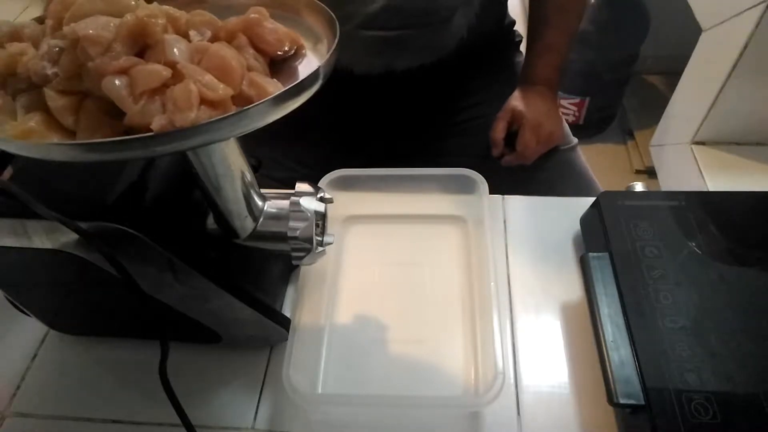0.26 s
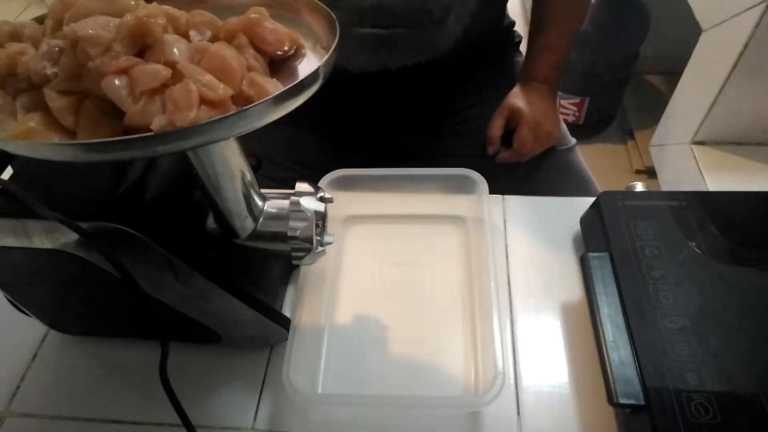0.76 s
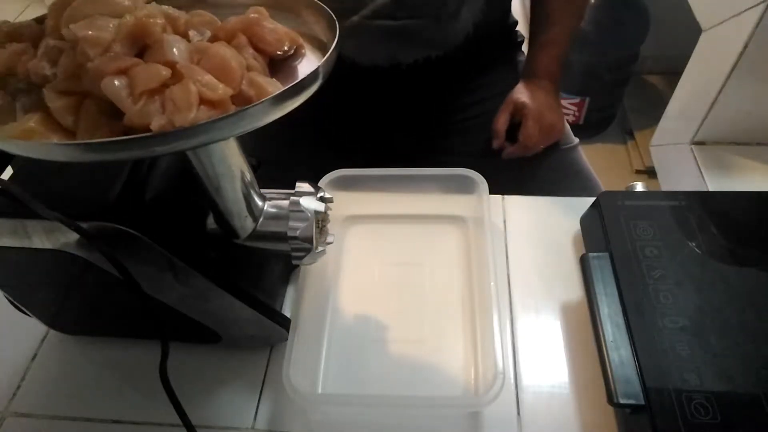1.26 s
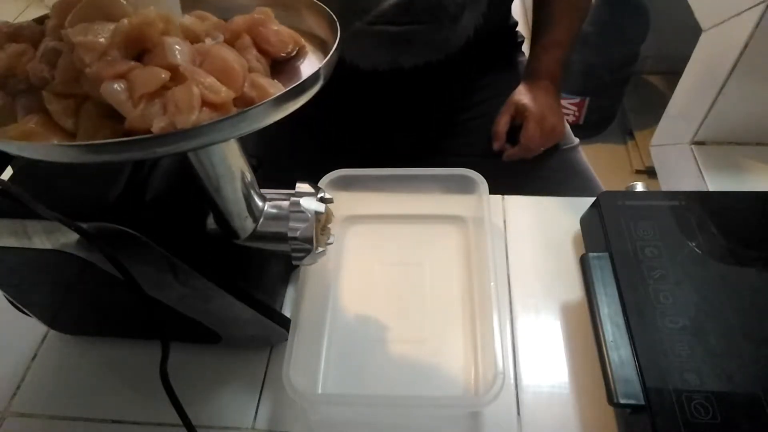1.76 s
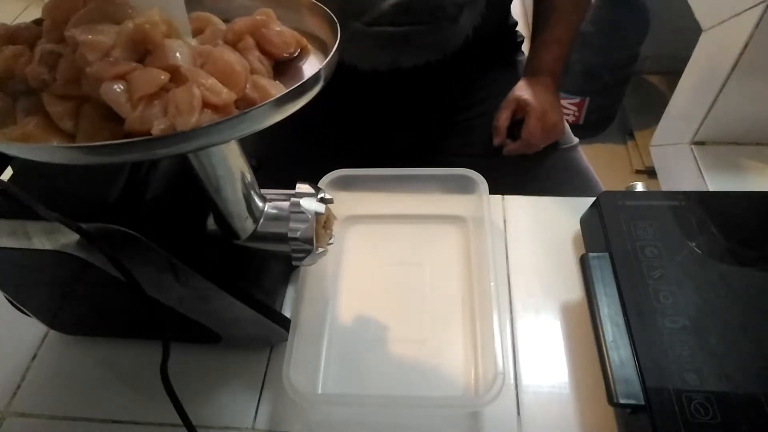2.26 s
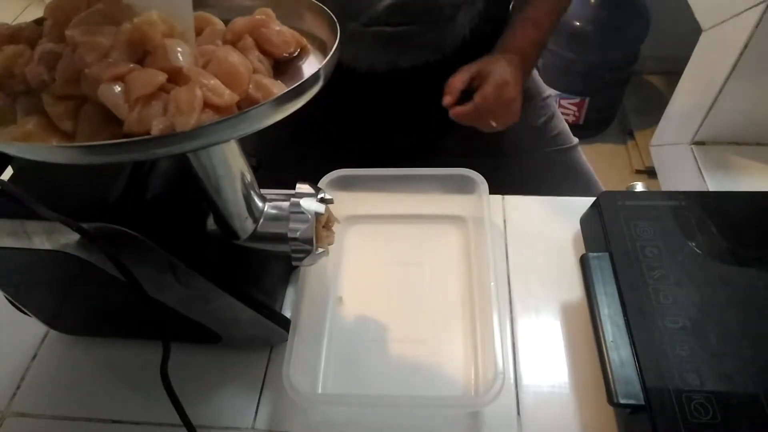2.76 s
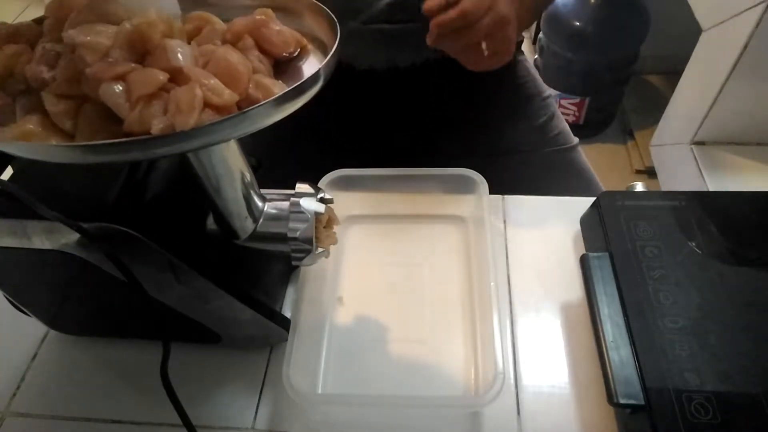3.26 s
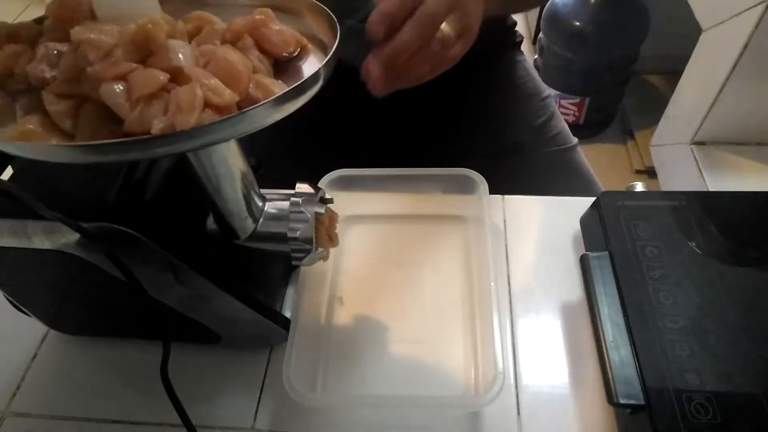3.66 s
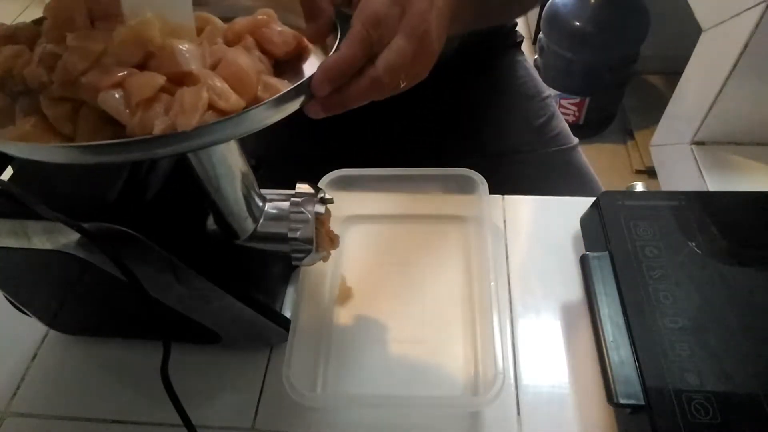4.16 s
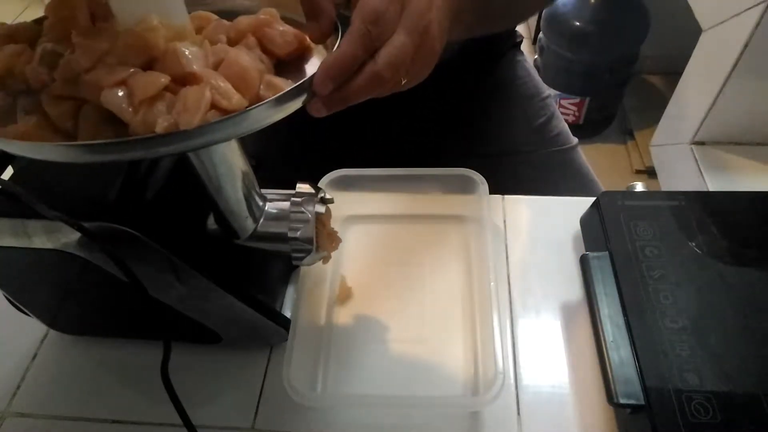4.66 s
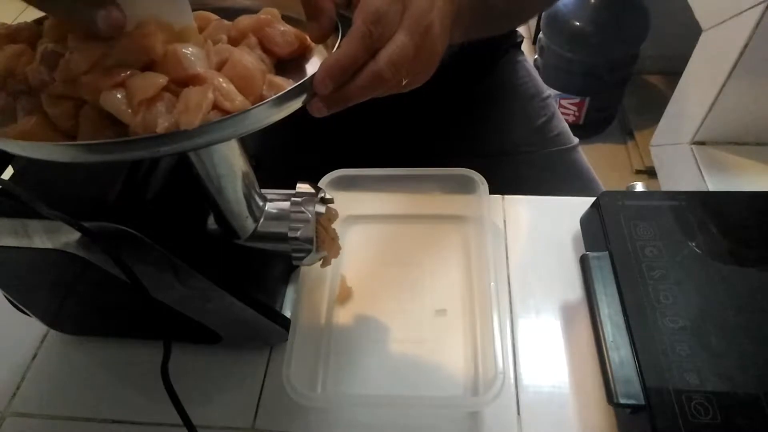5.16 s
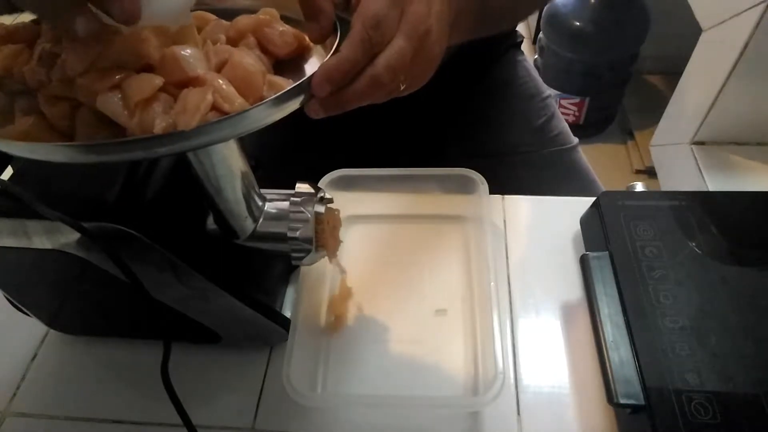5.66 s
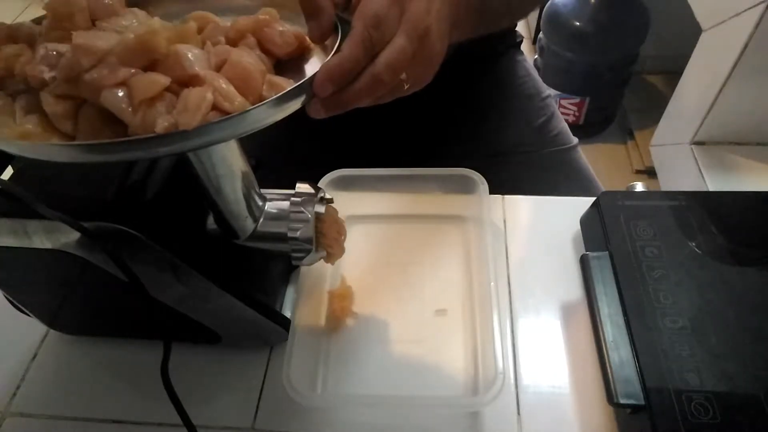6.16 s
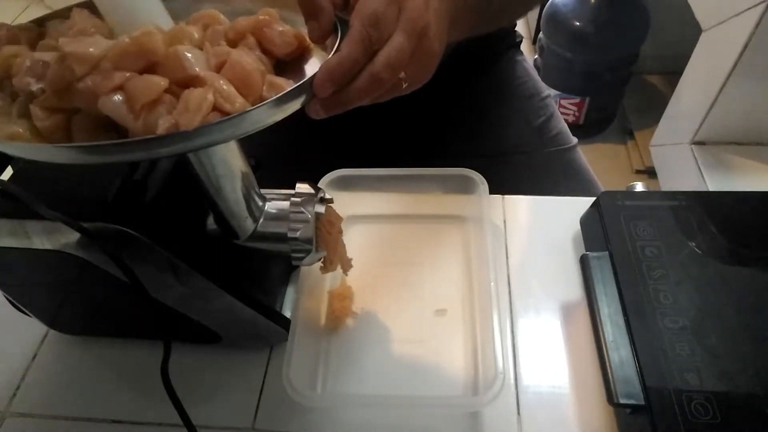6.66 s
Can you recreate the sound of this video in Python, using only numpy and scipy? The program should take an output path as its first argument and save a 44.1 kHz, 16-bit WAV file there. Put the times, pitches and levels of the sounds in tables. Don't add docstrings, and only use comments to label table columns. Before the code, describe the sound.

A loud electric meat grinder is already running and never stops, close to a phone on a hard kitchen counter. From 0 to about 2.5 s it runs empty: a steady hum near 275 Hz, stacked buzzing gear tones, dense gritty midrange roar and bright brush and fan hiss up to about 14 kHz. A gear tone near 1.9 kHz bites harder from 0.15 to 0.7 s. The load rocks gently, roughly every 0.37 s. Around 2.7 s the treble dips briefly, then from 3.5 s it dulls unevenly, staying muffled after 4.6 s. At 5.0 to 5.4 s a tough piece makes the gears strain around 3.5 kHz, then releases. By 5.8 s the auger is full: pitch has dropped slightly to about 262 Hz, the hum is much weaker, and the gear tones are rebalanced. It recovers very slightly, still running at 6.9 s.

```python
import sys
import numpy as np
from scipy import signal
from scipy.fft import rfft, irfft, next_fast_len
from scipy.io import wavfile
from scipy.ndimage import uniform_filter1d, minimum_filter1d, map_coordinates

SR = 44100
rng = np.random.default_rng(int(sys.argv[2]) if len(sys.argv) > 2 else 0)


def level_to_linear(level):
    exponent = np.asarray(level, float) / 20
    return 10 ** exponent


def store_wav(level_fs):
    pcm = np.round(np.clip(np.atleast_2d(level_fs), -1, 1) * 32767)
    wavfile.write(sys.argv[1], SR, pcm.T.astype(np.int16))


N = 304731

# (time [s], speed [turns/s], imbalance hum [dB])
MOTOR = [(0, 275.3, -16.6), (.3, 276.6, -18.4), (.9, 274.4, -18.6), (1.4, 272.8, -18.2),
         (2.1, 274.4, -16.5), (2.2, 274.6, -18.1), (2.8, 273.6, -15.6), (3.4, 274.2, -19.1),
         (3.8, 273.5, -18.4), (4.1, 273.8, -14.9), (4.5, 273.7, -20.1), (5.0, 271.9, -17.9),
         (5.2, 270, -22.5), (5.35, 269.9, -20.3), (6.1, 262.1, -27.5), (6.4, 262.7, -28.4),
         (6.75, 263.5, -25.3), (6.91, 265.6, -25.6)]
# (time [s], filling stage [0 empty, 1 starting, 2 filling, 3 full])
AUGER_FILL = [
    (0, 0),
    (3.2, 0),
    (4.9, 1),
    (5.1, 1),
    (5.4, 1),
    (5.47, 2),
    (5.79, 2),
    (5.83, 3),
    (6.91, 3),
]
# (time [s], level [dB])
VENT_COVER = [(0, -.5), (1.4, .5), (2.55, 0), (2.66, -2), (2.9, -0.5), (3.4, 0), (3.5, -2), (3.8, -4.5),
              (4.1, -2.2), (4.6, -6), (6.91, -6)]
# (start [s], end [s], level [dB])
BITE = (.14, .72, 6)
# (time [s], level [dB])
STRAIN = [
    (5, 0),
    (5.12, 2.5),
    (5.36, 4),
    (5.44, 0),
]
# (order [per turn], empty [dB], starting [dB], filling [dB], full [dB])
MESH = [(7, -35, -33.5, -36, -25.5), (14, -29.5, -31, -32, -35), (21, -38.5, -30.5, -36, -50),
        (35, -29.5, -29.5, -36, -43), (42, -36, -44, -36, -29.5)]
# (order [per turn], empty [dB], starting [dB], filling [dB], full [dB])
WHOLE_ORDERS = [(2, -54, -52, -37, -32), (3, -40, -37.5, -36, -43), (4, -49, -43, -37, -40),
                (5, -41, -40, -44, -38), (6, -37.5, -36.5, -39, -41), (8, -46, -38, -35, -36),
                (9, -41, -40, -54, -36), (10, -34, -34, -44, -32), (11, -32.5, -34, -42, -30.5),
                (12, -32, -31, -33, -31), (13, -32.5, -28, -36, -39), (15, -37, -41, -46, -54)]
# (order [per turn], empty [dB], full [dB])
FAINT_ORDERS = [(1.15, -39, -41), (1.5, -39.5, -43), (1.625, -45, -43), (2.375, -53, -39), (2.5, -53, -46),
                (3.375, -52, -46), (3.75, -56, -47), (5.75, -56, -41), (7.125, -42, -47), (7.25, -54, -41),
                (10.5, -56, -40), (13.4, -50, -37), (16, -47, -42), (17, -43, -45), (18, -44, -46),
                (20, -46, -42), (23, -41, -44), (24, -45, -38), (25, -39, -46), (26, -46, -45),
                (30, -41, -45), (33, -42, -48), (36, -31.5, -38), (38, -35, -43), (40, -35, -41)]
ROCKED = {1: (.5, .84), 6: (2, .9), 7: (3.5, .95), 8: (2, .05), 11: (1.2, .85), 12: (2.5, .72),
          13: (2.8, .2), 14: (4, .76), 35: (5, 0), 36: (3, .9)}
# (order [per turn], centre [Hz], half width [Hz])
WHISTLE = (42, 11030, 70)
# (centre [Hz], width [Hz], level [dB])
SHELL = [(310, 30, -8), (845, 130, 0), (1800, 310, -2.5), (2786, 100, -1), (3185, 110, -6.5),
         (3480, 93, 2.5), (5714, 170, -6.5), (6350, 150, -3), (6870, 120, -0.5)]
# (centre [Hz], width [Hz], depth [0-1])
DIPS = [(730, 50, 0.65), (2070, 54, 0.3), (3675, 57, 0.9), (4955, 380, 0.15)]
# (frequency [Hz], density [dB per Hz])
ROAR = [(410, -40), (700, -22.5), (820, -7.5), (1160, -7), (1440, -6.5), (1930, -6.5), (2500, -3.5),
        (3430, -1), (4690, -7.5), (5600, -5.5), (7000, -8), (7350, -19.5), (9000, -26.5), (12000, -90)]
# (frequency [Hz], density [dB per Hz])
WHINE = [(8000, -37), (9000, -9.5), (9300, -4), (9600, 0.5), (10200, 1.5), (10900, 0.5), (11400, -5),
         (12200, -17), (13500, -56)]
# (frequency [Hz], density [dB per Hz])
FAN = [(6000, -47), (7000, 1.5), (7500, -1), (8300, 3.5), (9000, 2), (10500, 2), (11800, -2.5), (13000, -4),
       (14300, -15)]
# (frequency [Hz], density [dB per Hz])
RUMBLE = [(70, -80), (105, -31), (125, -17), (155, -9), (230, -8), (310, -2.5), (350, -10.5), (420, -6),
          (500, -11), (700, -13.5), (850, -18), (1000, -29), (1300, -90)]
# (frequency [Hz], density [dB per Hz])
LOW_NOISE = [(20, -12), (40, -18), (70, -1), (110, 4), (140, -6), (200, -60)]
BANDS = [196, 216, 240, 264, 292, *range(320, 673, 32)]
LOOSE = [(196, .04), (320, .13), (352, .33), (416, .27), (544, .44), (608, .42), (640, .2)]
GAPS = (584, 8, .07)

WHEEL, AUGER = 1 / 8, 1 / 100.3
FRAME, GRID = 1024, 876


def unit(x):
    return x / np.sqrt(np.mean(x ** 2) + 1e-20)


def curves(rows):
    s, *columns = np.transpose(rows)
    return [np.interp(np.arange(N) / SR, s, column) for column in columns]


def wobble(rate):
    knots = rng.standard_normal(int(N * rate / SR) + 4)
    return map_coordinates(knots, [np.arange(N) * rate / SR], order=1)


def filtered(x, response):
    m = next_fast_len(N + 8192)
    return irfft(rfft(x, m) * response(np.fft.rfftfreq(m, 1 / SR)), m)[..., :N]


def colour(points):
    f, db = np.transpose(points)
    return lambda hz: level_to_linear(np.interp(np.log(hz + 1), np.log(f), db))


def patchy(depth_db, bins, frames):
    z = signal.stft(rng.standard_normal(N), nperseg=512)[2]
    field = uniform_filter1d(rng.standard_normal(z.shape), bins, axis=0)
    field = uniform_filter1d(field, frames, axis=1)
    return signal.istft(z * level_to_linear(depth_db * unit(field)), nperseg=512)[1][:N]


def rock(turns, at):
    return np.cos(2 * np.pi * (AUGER * turns - at))


def beat(turns, order):
    return np.cos(2 * np.pi * (order * turns + rng.random()))


def armature():
    speed = curves(MOTOR)[0]
    sag = 0.8 * rock(np.cumsum(speed) / SR, at=0.73)
    return np.cumsum(speed + sag) / SR


def tone(turns, order, db, swell_db, drift):
    phase = 2 * np.pi * (order * turns + rng.random()) + drift * wobble(25)
    level_db = db + swell_db * (0.7 * wobble(6) + wobble(12))
    return np.sqrt(2) * level_to_linear(level_db) * np.sin(phase)


def load_swing(turns, order, stage):
    if order not in ROCKED:
        return 0
    swing_db, at = ROCKED[order]
    swing = rock(turns, at)
    return swing_db * (1 - 0.23 * stage) * (swing + 0.35 * (1 - 2 * swing ** 2))


def imbalance_hum(turns, stage):
    db = curves(MOTOR)[1] + load_swing(turns, 1, stage) + 0.2 + 1.1 * wobble(16)
    return tone(turns, 1, db, swell_db=0.5, drift=0.06)


def tones(turns):
    stage, cover_db, strain_db = curves(AUGER_FILL)[0], curves(VENT_COVER)[0], curves(STRAIN)[0]
    t = np.arange(N) / SR
    start, end, bite_db = BITE
    biting = (t > start) & (t < end)
    out = imbalance_hum(turns, stage)
    for order, *stage_db in MESH + WHOLE_ORDERS + FAINT_ORDERS:
        swing_db = load_swing(turns, order, stage)
        db = np.interp(stage, np.linspace(0, 3, len(stage_db)), stage_db) + swing_db - 0.6
        if order == 7:
            db = db + biting * (bite_db - 0.7 * swing_db)
        if 28 < order < 41:
            db = db + 1.3 * cover_db
        if order in (12, 13):
            db = db + (1 if order == 13 else 0.5) * strain_db
        if order == WHISTLE[0]:
            detuning = (order * np.gradient(turns) * SR - WHISTLE[1]) / WHISTLE[2]
            db = db - np.minimum(9, 6 * detuning ** 2)
        steady = order in (2, 7, 13, 14, 21, 35)
        swell_db = 1.15 if steady else 1.9 + 0.25 * stage
        out += tone(turns, order, db, swell_db, drift=0.1 + 0.009 * order)
    return out


def shell_response(f):
    return 1 + 0.51 * sum(level_to_linear(db) / (1 + (2 * (f - c) / w) ** 2) for c, w, db in SHELL)


def worktop_response(f):
    return np.prod([1 - depth / (1 + (2 * (f - c) / w) ** 2) for c, w, depth in DIPS], axis=0)


def roar(turns):
    stage = curves(AUGER_FILL)[0]
    rubbing = 1 + 0.095 * beat(turns, 1) + 0.16 * beat(turns, 2) + 0.089 * beat(turns, 3)
    rubbing = rubbing + 0.023 * beat(turns, WHEEL)
    response = lambda f: colour(ROAR)(f) * shell_response(f) * worktop_response(f)
    noise = unit(filtered(rubbing * patchy(1.5, bins=3, frames=12), response))
    load_db = 1.45 * np.minimum(stage * 4, 1) - 0.47 * stage
    return level_to_linear(-21 + 0.13 * rock(turns, at=0.73) + load_db + 0.42 * wobble(6)) * noise


def brush_whine(turns):
    cover_db = curves(VENT_COVER)[0]
    sparks = 1 + 0.078 * beat(turns, 3) + 0.15 * beat(turns, 2 * WHEEL)
    sparks = sparks * level_to_linear(1.2 * wobble(14) + 0.9 * wobble(40))
    noise = unit(filtered(sparks * patchy(1.42, bins=4, frames=10), colour(WHINE)))
    swing_db = (0.6 - 0.14 * cover_db) * rock(turns, at=0.98)
    return level_to_linear(-19.5 + cover_db + swing_db + 0.5 * wobble(13)) * noise


def fan_hiss():
    slow_cover_db = uniform_filter1d(curves(VENT_COVER)[0], size=SR // 3)
    noise = unit(filtered(level_to_linear(1.3 * wobble(15)) * patchy(1.5, bins=4, frames=8), colour(FAN)))
    return level_to_linear(-23.5 + 0.87 * slow_cover_db) * noise


def rumble(turns):
    cover_db = curves(VENT_COVER)[0]
    source = (1 + 0.5 * beat(turns, 0.5)) * patchy(1.5, bins=2, frames=14)
    return level_to_linear(-32 - 0.28 * cover_db + 1.35 * wobble(8)) * unit(filtered(source, colour(RUMBLE)))


def low_noise():
    source = level_to_linear(3.4 * wobble(10)) * rng.standard_normal(N)
    return level_to_linear(-61) * unit(filtered(source, colour(LOW_NOISE)))


def scene():
    turns = armature()
    noise = roar(turns) + brush_whine(turns) + fan_hiss() + rumble(turns) + low_noise()
    return np.tile(tones(turns) + noise, (2, 1))


def loose_treble(dry):
    n, k = np.arange(2 * FRAME), np.arange(FRAME)[:, None]
    window = signal.windows.kaiser_bessel_derived(2 * FRAME, 4 * np.pi)
    basis = np.sqrt(2 / FRAME) * window * np.cos(np.pi / FRAME * (n + 0.5 + FRAME / 2) * (k + 0.5))
    lead, frames = 2 * FRAME - GRID, N // FRAME + 3
    at = FRAME * np.arange(frames)[:, None] + n
    lines = np.pad(dry, ((0, 0), (lead, 3 * FRAME)))[:, at] @ basis.T
    fresh = rng.standard_normal(lines.shape)
    together = unit(uniform_filter1d(rng.standard_normal(frames), size=2))
    for lo, hi in zip(BANDS, BANDS[1:]):
        share = np.interp(lo, *np.transpose(LOOSE))
        band = slice(lo, hi)
        size = np.sqrt(np.mean(lines[..., band] ** 2, axis=2, keepdims=True))
        dice = unit(uniform_filter1d(rng.standard_normal(frames), size=2)) + 0.7 * together
        crest = abs(lines[0, :, band]).max(1) / (size[0, :, 0] + 1e-9)
        dice = dice + 1.2 * crest
        loose = dice < np.quantile(dice, share)
        lines[:, loose, band] = (size * fresh[..., band])[:, loose]
    first, width, share = GAPS
    dice = uniform_filter1d(rng.standard_normal((frames, FRAME // width)), size=2, axis=0)
    dice = dice + 0.5 * together[:, None]
    gone = np.repeat(dice > np.quantile(dice, 1 - share), width, axis=1) & (k.T >= first)
    lines = lines * ~gone
    return np.array([np.bincount(at.ravel(), (c @ basis).ravel())[lead:lead + N] for c in lines])


def limited(x, top):
    need = np.minimum(1, top / (abs(x).max(0) + 1e-9))
    return x * uniform_filter1d(minimum_filter1d(need, size=401), size=200)


def top_cut(x):
    return signal.sosfilt(signal.butter(12, 14170, fs=SR, output="sos"), x)


def record(dry):
    mix = limited(loose_treble(dry), top=0.86)
    return top_cut(mix)


dry = scene()
out = record(dry)
store_wav(out)
```